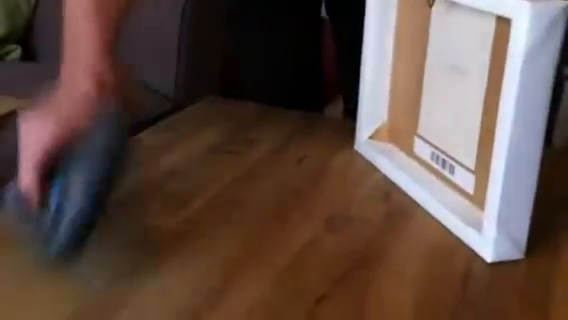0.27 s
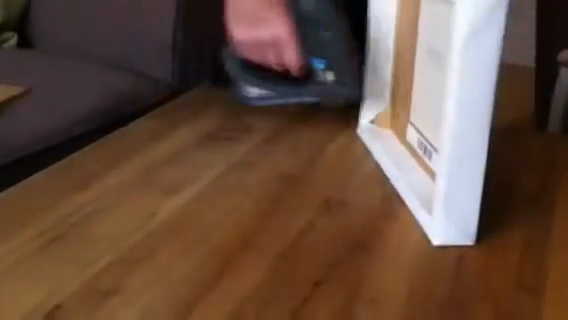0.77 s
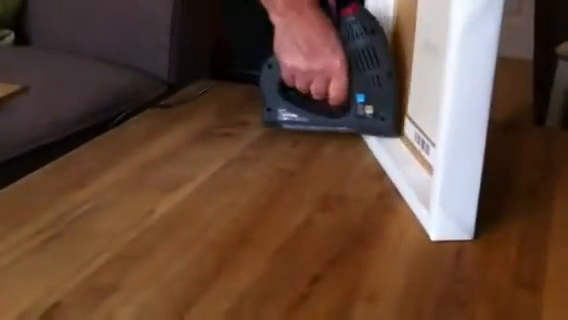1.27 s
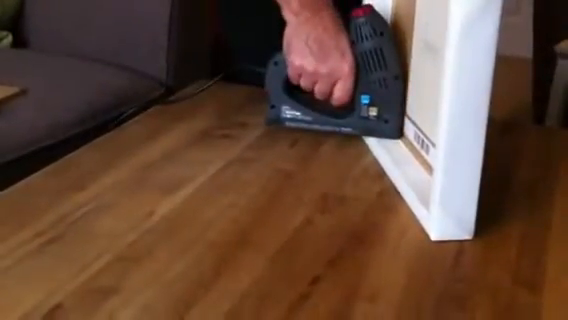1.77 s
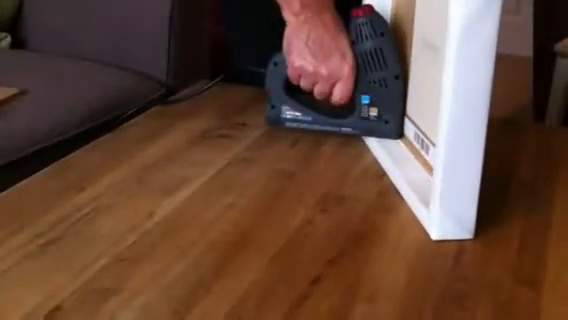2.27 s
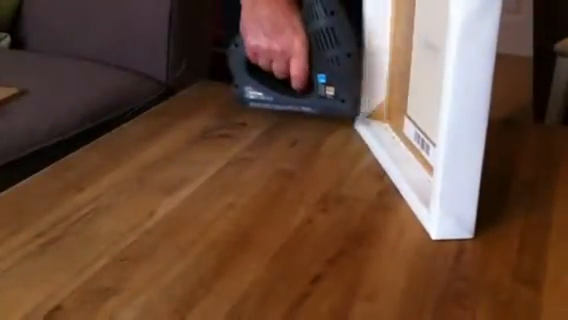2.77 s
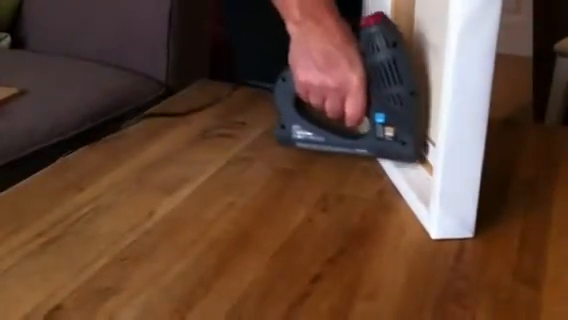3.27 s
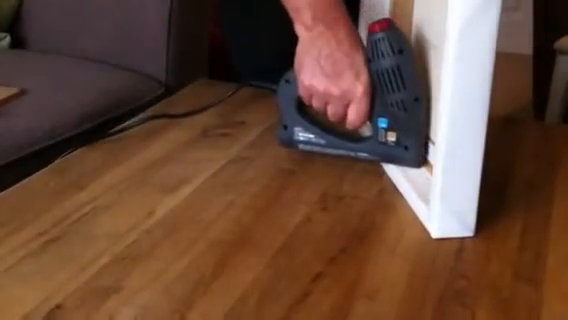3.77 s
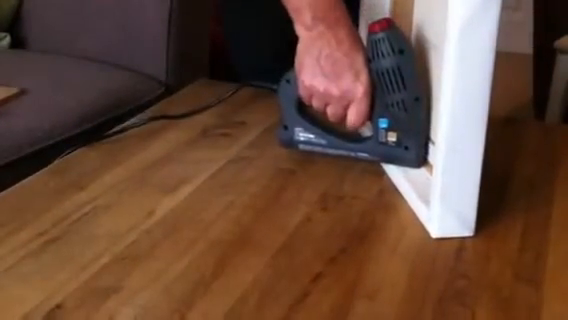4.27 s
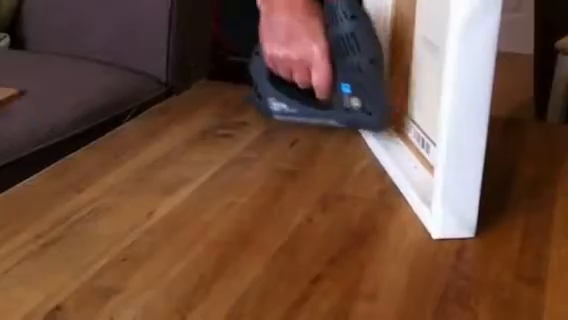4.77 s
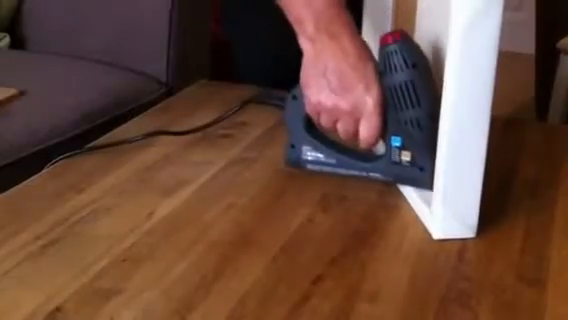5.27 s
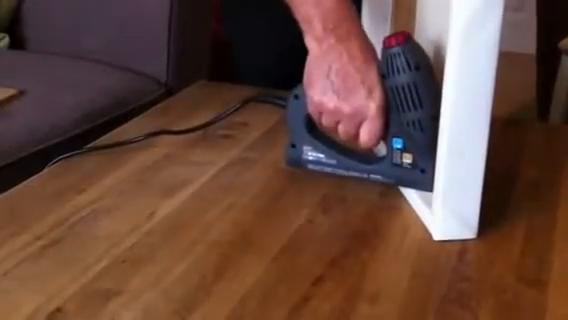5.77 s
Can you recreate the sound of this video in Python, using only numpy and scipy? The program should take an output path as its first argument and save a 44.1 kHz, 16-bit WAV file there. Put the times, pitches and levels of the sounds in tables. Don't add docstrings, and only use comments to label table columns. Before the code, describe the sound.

An electric staple gun knocks off a wooden table, scrapes and clicks, then fires two loud sharp cracks into a canvas frame, about two seconds apart.

```python
import sys
import numpy as np
from scipy import signal
from scipy.fft import rfft, irfft
from scipy.io import wavfile
from scipy.ndimage import uniform_filter1d

SR = 44100
rng = np.random.default_rng(int(sys.argv[2]) if len(sys.argv) > 2 else 0)


def waveform_to_disk(signal):
    frames = np.transpose(np.atleast_2d(signal))
    scaled = np.clip(frames, -1, 1) * 32767
    samples = np.round(scaled).astype(np.int16)
    wavfile.write(sys.argv[1], SR, samples)


def convert_level_to_amplitude(level_db):
    exponent = np.asarray(level_db, float) / 20
    return 10 ** exponent


N = 265967


def unit(x):
    return x / np.sqrt(np.mean(x ** 2) + 1e-30)


def colour(x, shape):
    hz, db = np.transpose(shape)
    f = np.maximum(np.arange(len(x) // 2 + 1) * SR / len(x), 1)
    return irfft(rfft(x) * convert_level_to_amplitude(np.interp(np.log(f), np.log(hz), db)), len(x))


def band(x, hz, width_hz):
    return signal.lfilter(*signal.iirpeak(min(hz, SR / 2.2), hz / width_hz, fs=SR), x)


def ring(modes, length_s, scatter_db=3.5):
    t = np.arange(int(length_s * SR)) / SR
    chance = rng.standard_normal((len(modes), 2))
    out = np.zeros(len(t))
    for (hz, db, t60_s), (a, b) in zip(modes, chance):
        level = convert_level_to_amplitude(db + scatter_db * a) * np.sign(b)
        out += level * np.sin(2 * np.pi * hz * t) * convert_level_to_amplitude(-60 * t / t60_s)
    return out


def burst(shape, t60_s, length_s=.1):
    t = np.arange(int(length_s * SR)) / SR
    noise = unit(colour(rng.standard_normal(4410), shape))
    return noise[:len(t)] * convert_level_to_amplitude(-60 * t / t60_s)


def walk(rate_hz):
    k = int(SR / rate_hz)
    return uniform_filter1d(np.repeat(rng.standard_normal(N // k + 1), k), k)[:N]


def hold(s, held_s, rise_db_s, fall_db_s):
    t = np.arange(N) / SR
    return convert_level_to_amplitude(-rise_db_s * np.maximum(s - t, 0) - fall_db_s * np.maximum(t - s - held_s, 0))


def add(out, s, x, peak_db):
    i = int(s * SR)
    x = x[:N - i]
    out[i:i + len(x)] += x * convert_level_to_amplitude(peak_db) / np.max(np.abs(x))


def excite(walls, s, shape, energy_db):
    click = np.roll(colour(np.eye(1, 2048)[0], shape), 1024)
    i = int(s * SR) - 1024
    walls[i:i + 2048] += click * convert_level_to_amplitude(energy_db) / np.linalg.norm(click)


# centre in Hz, t60 in s, level in dB.
ROOM_BANDS = [(150, 0.1, 0.5), (280, 0.33, 1), (600, 0.18, 1.5), (1120, 0.3, -0.5), (2220, 0.32, 0),
              (4570, .27, 0.5), (7900, .24, -0.5), (12500, 0.11, 5)]


def room():
    rise_s = .007
    t = np.arange(int(.6 * SR)) / SR
    tail = np.zeros(len(t))
    for hz, t60_s, db in ROOM_BANDS:
        tail += convert_level_to_amplitude(db - 60 * t / t60_s) * band(rng.standard_normal(len(t)), hz, 1.2 * hz)
    tail *= 1 - np.exp(-(t / rise_s) ** 2)
    return tail / np.linalg.norm(tail)


# delay in s, level in dB.
REFLECTIONS = [
    (.0068, -16),
    (.0108, -10),
    (.0146, -10),
    (.024, -14),
]


def echoes():
    response = np.eye(1, 2048)[0]
    for s, db in REFLECTIONS:
        smear = rng.standard_normal(24) * np.exp(-np.arange(24) / 5)
        i = int(s * SR)
        response[i:i + 24] += convert_level_to_amplitude(db) * smear / np.linalg.norm(smear)
    return response


# Hz, density in dB per Hz.
HISS_COLOUR = [(35, -66), (60, -36), (103, -12), (143, -12.5), (176, -3.5), (289, -7.5), (383, -6.5),
               (598, -13), (850, -9), (1720, -14.5), (1980, -14), (14900, -21), (16300, -28)]
# start in s, held in s, dB over calm.
BUSTLE_AT = [
    (0.0, .2, 5.5),
    (.5, .25, 1),
    (.8, .7, 3),
    (3.47, 0.035, 7),
    (5.27, 0.022, 2),
    (5.5, .5, 1.5),
]


def background():
    hiss_db, air_db, stir_db_s = -67, -70, 150.5
    sag_db, sag_s, duck_db, duck_s = -5.5, 2.5, -7.5, 0.33
    t = np.arange(N) / SR
    noise = colour(rng.standard_normal(N), HISS_COLOUR)
    low = signal.sosfilt(signal.butter(2, 1800, fs=SR, output="sos"), noise)
    stir = 1 + sum((convert_level_to_amplitude(db) - 1) * hold(s, held_s, stir_db_s, stir_db_s) for s, held_s, db in BUSTLE_AT)
    since_s = [t - shot[0] for shot in SHOT_AT]
    sag = np.min([sag_db * (u > 0) * np.exp(-np.abs(u) / sag_s) for u in since_s], axis=0)
    duck = sum(duck_db * (u > 0) * np.exp(-(u / duck_s) ** 2 / 2) for u in since_s)
    hiss = unit(noise - low) * convert_level_to_amplitude(hiss_db + sag + duck)
    air = unit(low) * stir * convert_level_to_amplitude(air_db + .6 * sag + .4 * duck + 1.2 * walk(8.7))
    return hiss + air


# start in s, held in s, lower hum in dB, upper hum in dB.
GRIP_AT = [
    (0.0, 0.3, -65, -73.5),
    (1.45, 0.33, -88.5, -80),
    (1.8, 0.46, -86.5, -73),
    (3.58, .64, -73.5, -78.5),
    (5.3, 0.22, -85.5, -89.5),
    (5.62, .45, -68.5, -74.5),
]


def frame_hum():
    width_hz, grip_db_s, tremor_db, tremor_hz = 4, 129, 2.5, 11
    out = np.zeros(N)
    for k, hz in enumerate((136, 220)):
        grip = sum(convert_level_to_amplitude(row[2 + k]) * hold(row[0], row[1], grip_db_s, grip_db_s) for row in GRIP_AT)
        phase = 2 * np.pi * np.cumsum(hz + width_hz * walk(11)) / SR
        out += np.sin(phase) * grip * convert_level_to_amplitude(tremor_db * walk(tremor_hz))
    return out


# start in s, held in s, rasp in dB, rumble over rasp in dB, hiss over rasp in dB.
SLIDE_AT = [
    (0.0, .13, -65, 8, -7.5),
    (.565, 0.097, -54.5, -1.5, -2),
    (4.65, 0.054, -68, -9, -13),
    (4.95, 0.11, -70.5, -11, -18),
]
# Hz, width in Hz, level in dB.
SLIDE_PEAKS = [
    [(714, 330, -9), (2180, 670, -5), (1597, 2900, 0)],
    [(955, 350, 2), (1570, 240, -5), (1520, 1650, 5)],
    [(814, 390, 4.5), (1093, 400, -11), (1680, 910, 0.5)],
    [(832, 245, 2), (1090, 650, 2.5), (1820, 810, -6.5)],
]


def slides():
    attack_db_s, release_db_s, creep_db, creep_db_s = 441, 396, -10, 70
    grains = rng.standard_normal((3, N)) * convert_level_to_amplitude(2.5 * rng.exponential(size=(3, N)))
    rumble = unit(band(band(grains[0], 236, 310), 236, 310))
    hiss = unit(colour(grains[2], [(1500, -30), (3000, 0.0), (8000, -1.5), (15000, -9.0)]))
    out = np.zeros(N)
    for (s, held_s, rasp_db, rumble_db, hiss_db), peaks in zip(SLIDE_AT, SLIDE_PEAKS):
        rasp = np.zeros(N)
        for hz, width_hz, db in peaks:
            peak = unit(band(band(grains[1], hz, width_hz), hz, 2 * width_hz))
            rasp += convert_level_to_amplitude(db + 3.0 * walk(18)) * peak
        layers = unit(rasp) + convert_level_to_amplitude(rumble_db) * rumble + convert_level_to_amplitude(hiss_db) * hiss
        swell = hold(s, held_s, attack_db_s, release_db_s)
        creep = convert_level_to_amplitude(creep_db) * hold(s, held_s, creep_db_s, creep_db_s)
        out += layers * convert_level_to_amplitude(rasp_db) * (swell + creep)
    return out


# start in s, length in s, Hz, width in Hz, peak in dB.
SQUEAK_AT = [(.02, 0.074, 2300, 200, -56), (4.963, .07, 620, 60, -60), (4.975, 0.08, 1555, 70, -61),
             (5.04, .07, 634, 54, -61), (4.93, 0.088, 850, 250, -63), (4.64, .09, 800, 300, -60),
             (.548, .05, 950, 150, -51), (5.265, .05, 810, 700, -60), (4.97, .08, 2250, 400, -64)]


def squeaks(air):
    for s, length_s, hz, width_hz, db in SQUEAK_AT:
        swell = np.hanning(int(length_s * SR))
        tone = band(band(rng.standard_normal(8820), hz, width_hz), hz, 2 * width_hz)
        add(air, s, swell * tone[-len(swell):], db)


# start in s, peak in dB, ring in Hz, t60 in s.
THUD_AT = [(0.009, -43, 404, 0.057), (0.052, -41, 162, 0.1), (0.099, -46.5, 159, 0.097),
           (0.141, -48, 236, 0.087), (1.371, -46.5, 226, 0.064), (1.387, -45.5, 221, 0.082),
           (1.501, -48, 163, 0.17), (1.651, -57, 170.3, 0.11), (3.443, -45.5, 239, 0.087),
           (3.551, -46.5, 138, 0.081), (5.267, -51.5, 307, 0.043), (5.363, -57, 137.3, 0.1),
           (5.482, -34, 150, 0.11), (5.609, -55.5, 142, 0.13), (5.483, -43.5, 287, 0.063),
           (5.521, -53, 250, 0.097), (5.27, -54.5, 162.6, .08)]


def thuds(air, wood, walls):
    push = np.gradient(np.hanning(int(.0045 * SR)))
    for s, db, hz, t60_s in THUD_AT:
        modes = [(hz, 0, t60_s), (1.5 * hz, -5, 0.65 * t60_s), (.72 * hz, -5, t60_s)]
        add(wood, s, np.convolve(ring(modes, .3), push), db - 1)


# start in s, peak in dB, ring in Hz, contact in s, grit in dB.
TAP_AT = [(0.811, -32.5, 1330, 0.0026, -6), (0.815, -37.5, 980, 0.0098, -6.5),
          (0.822, -40, 2170, 0.0033, -13), (2.582, -50.5, 930, 0.004, -6),
          (2.614, -36.5, 1494, 0.0032, -3.5), (3.447, -45, 1114, 0.0024, -7),
          (3.451, -42, 1141, 0.0046, -23), (4.471, -43.5, 1010, 0.0051, -4.5),
          (4.49, -44, 1450, 0.0028, -4), (4.502, -43.5, 4270, 0.0037, -2), (5.464, -59, 1810, 0.0035, -3.5),
          (0.052, -49, 520, 0.0064, -13.5), (0.101, -48, 480, 0.0049, -13.5)]


def taps(air, wood, walls):
    for s, db, hz, contact_s, grit_db in TAP_AT:
        modes = [(hz, 0, 4 * contact_s), (1.68 * hz, -4, 3 * contact_s),
                 (0.884 * hz, -5, 4 * contact_s), (2.7 * hz, grit_db, 3 * contact_s)]
        grit = [(0.33 * hz, -30), (0.6 * hz, -6), (hz, 0), (1.66 * hz, -3), (2.03 * hz, -9),
                (2.0 * hz, -0.5 + grit_db), (max(7000, 3 * hz), 3 * grit_db), (15000, -19.5 + 3 * grit_db)]
        add(air, s, ring(modes, .06), db + 0.1)
        add(air, s, burst(grit, 8 * contact_s), db - 3.0)
        excite(walls, s, grit, db + 9)


# start in s, peak in dB, low ring in dB, high ring in dB.
CLICK_AT = [
    (1.477, -38.5, -6, 3),
    (2.6054, -54, -10, -3),
    (3.4645, -41, -6, 6.5),
    (4.4822, -44, 2, -3.5),
    (5.45, -44.5, -14, 4.5),
]
# Hz, level in dB, t60 in s.
SWITCH_MODES = [(5450, 4, 0.0093), (7900, -5, .01), (9300, 0, 0.007), (9900, 4, 0.0032)]


def clicks(air, wood, walls):
    for s, db, low_db, high_db in CLICK_AT:
        tilt_db = np.linspace(low_db, high_db, len(SWITCH_MODES))
        modes = [(hz, d + k, t60_s) for (hz, d, t60_s), k in zip(SWITCH_MODES, tilt_db)]
        snap = [(3500, -7), (5000, low_db + 3), (5700, low_db + 13), (6400, -8), (7400, 1), (8400, 1.5),
                (10000, high_db), (11500, high_db - 3.5), (14000, -29)]
        add(air, s, ring(modes, 0.019), db + 0.1)
        add(air, s, burst(snap, 0.033), db - 3.5)
        excite(walls, s, snap, db + 7)


# start in s, peak in dB.
BODY_KNOCK_AT = [
    (0.25, -11),
]
# Hz, level in dB, t60 in s.
KNOCK_MODES = [(244, -27, 0.04), (323, -14, .09), (436, -11, .08), (540, -11, .08), (800, -10.5, .07),
               (670, -4.5, .05), (747, -5.5, .05), (625.5, -7, 0.07), (983, -16.5, 0.062),
               (1617, -6.5, 0.026), (1964, -14.5, 0.033), (2702, -12, .03), (4530, -14, 0.013)]
# Hz, density in dB per Hz.
KNOCK_NOISE = [(400, -30.5), (900, -10.5), (1500, 2.5), (2300, -3), (4400, -8.5), (6000, -9),
               (10000, -11.5), (16000, -25)]
# Hz, density in dB per Hz.
KNOCK_TO_WALLS = [(88, -47.5), (150, -10), (264, -17), (321, -2), (534, -11), (730, -4), (1170, -12.5),
                  (1530, -15.5), (1690, -17), (2310, -19.5), (3700, -27.5), (9820, -28.5), (16000, -37.5)]


def knock(air, wood, walls):
    s, db = BODY_KNOCK_AT[0][:2]
    add(air, s, burst(KNOCK_NOISE, 0.073), db - 5)
    add(air, s + 0.00051, ring(KNOCK_MODES[8:], .1), db - 6)
    add(air, s + 0.0027, ring(KNOCK_MODES, .4), db - 2)
    add(wood, s + .0028, ring([(706, 0, 0.027)], .1), db + 1.5)
    add(wood, s - .012, ring(FRAME_MODES[4:9], 0.089), db - 37)
    excite(walls, s + .002, KNOCK_TO_WALLS, db + 15)


# start in s, first strike in dB, second strike in dB, rebound in dB.
SHOT_AT = [
    (2.314, -2, -2.5, -8.5),
    (4.2192, -2, -2, -8),
]
# Hz, level in dB, t60 in s.
SHELL_MODES = [(1455, -1.5, .025), (1893, -1, 0.015), (2365, -3, .02), (3700, -11, 0.019),
               (4400, -7.5, .015), (5220, -3.5, .015), (5665, -5.5, .012), (7400, -1, 0.014),
               (8860, -7.5, 0.0058), (9500, -6.5, .012), (11500, -5.5, 0.0071), (12700, -10.5, 0.012)]
# Hz, level in dB, t60 in s.
FRAME_MODES = [(120, -10, .2), (150, -1, 0.13), (174, -1.5, .2), (206, -3.5, 0.16), (231.4, -5, 0.17),
               (264, -1, 0.17), (315.6, -4, 0.14), (390.5, -7, 0.1), (556.1, -14, 0.072), (705, -8, .08),
               (1042, -8, 0.069)]
# Hz, density in dB per Hz.
STRIKE_NOISE = [(240, -27.5), (400, 0), (553, -8), (1010, 0), (3160, -3), (3810, -10), (4110, -3),
                (11800, -8.5), (16000, -21.5)]
# Hz, density in dB per Hz.
SHOT_TO_WALLS = [(59, -42), (100, -11), (202, -3), (308, -5.5), (524, -19.5), (676, -7.5), (872, -11.5),
                 (1060, -9), (1310, -11.5), (2320, -13.5), (4870, -17), (5420, -17.5), (10500, -14),
                 (13200, -21), (16000, -31.5)]


def shots(air, wood, walls):
    coil_s, coil_db, travel_s, travel_db = .017, -47, .004, -24
    stop_lag_s, rebound_s, frame_lag_s, frame_db = .0031, .0176, .002, -12.5
    for s, first_db, second_db, rebound_db in SHOT_AT:
        add(air, s - travel_s, burst(STRIKE_NOISE, .03, travel_s)[::-1], travel_db)
        add(air, s - coil_s, burst(STRIKE_NOISE, .2, coil_s)[::-1], coil_db)
        add(air, s, ring(SHELL_MODES[:6], .06, scatter_db=0), first_db)
        add(air, s + .0008, burst(STRIKE_NOISE, 0.066), first_db - 3.0)
        add(air, s + stop_lag_s, ring(SHELL_MODES, 0.065), second_db - 3.0)
        add(air, s + stop_lag_s, burst(STRIKE_NOISE, 0.011), second_db + 0.26)
        add(air, s + rebound_s, ring(SHELL_MODES[8:], .04), rebound_db)
        boom = np.convolve(ring(FRAME_MODES, .5, scatter_db=.5), np.hanning(40))
        add(wood, s + frame_lag_s, boom, frame_db)
        excite(walls, s + .002, SHOT_TO_WALLS, 12)


def scene():
    air, wood, walls = np.zeros((3, N))
    squeaks(air)
    for source in (thuds, taps, clicks, knock, shots):
        source(air, wood, walls)
    near = signal.fftconvolve(air, echoes())[:N]
    far = signal.fftconvolve(walls + convert_level_to_amplitude(-12) * wood, room())[:N]
    far = signal.sosfilt(signal.butter(3, 125, "high", fs=SR, output="sos"), far)
    return (near + far + wood + slides() + background() + frame_hum())[None]


def top_cut(x):
    return signal.sosfilt(signal.butter(12, 16330, fs=SR, output="sos"), x)


def record(dry):
    drift_db, top_hz = -100, 16100
    x = signal.sosfilt(signal.butter(4, 100, "high", fs=SR, output="sos"), dry)
    x = np.tanh(x / 1.501) * 1.534
    x += .025 * x ** 2
    drift = colour(rng.standard_normal(N), [(10, 1.5), (30, -4.5), (100, -19.5), (200, -49)])
    x += convert_level_to_amplitude(drift_db) * unit(drift)
    x = signal.sosfilt(signal.ellip(8, .2, 70, top_hz, fs=SR, output="sos"), x)
    return top_cut(x)


dry = scene()
out = record(dry)
waveform_to_disk(out)
```